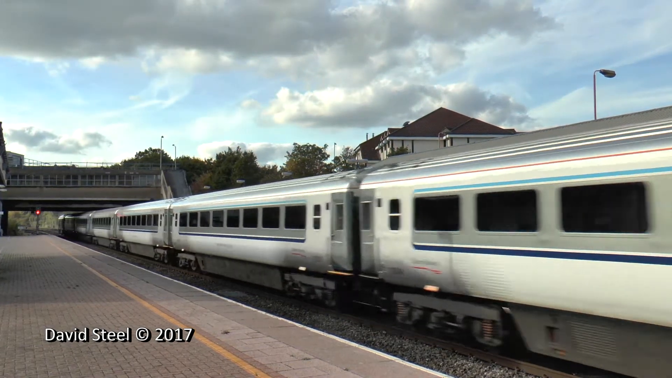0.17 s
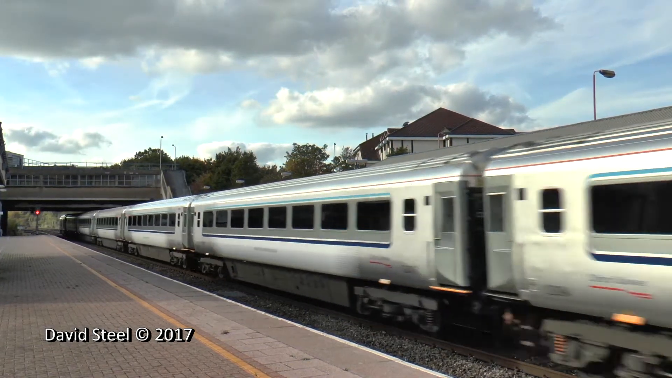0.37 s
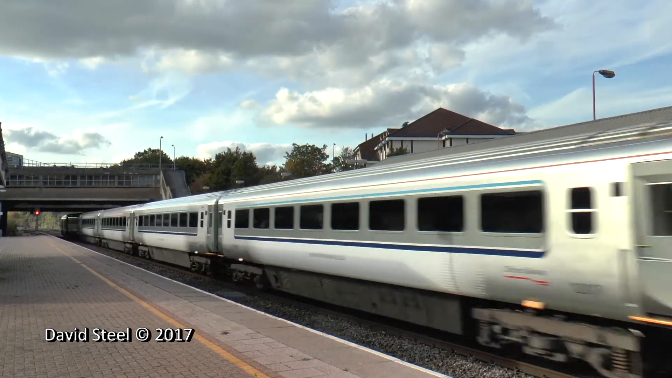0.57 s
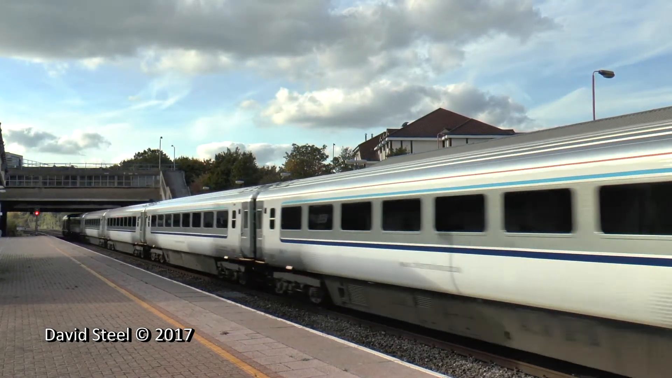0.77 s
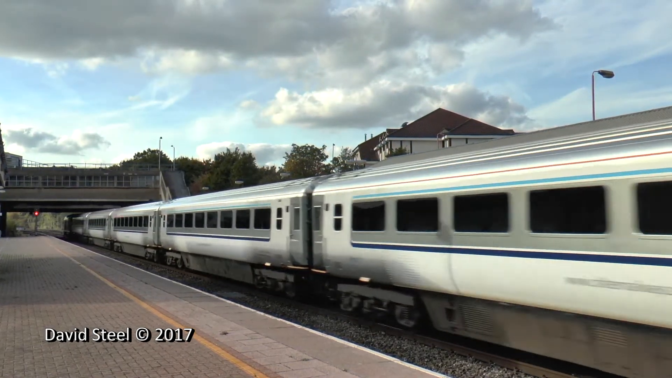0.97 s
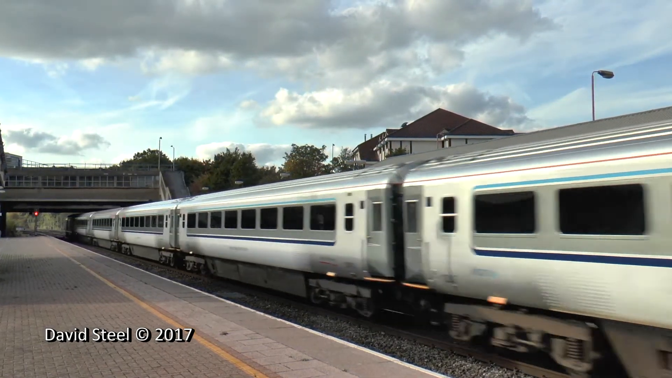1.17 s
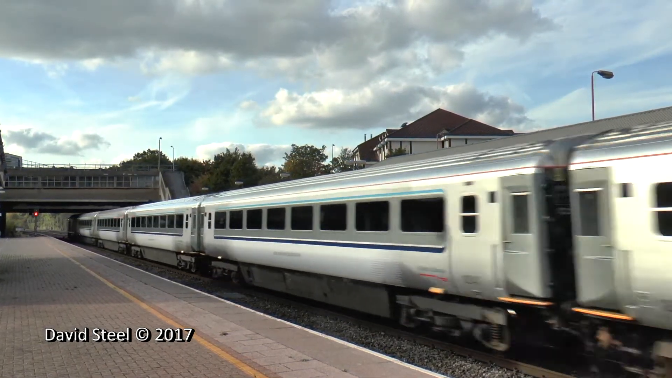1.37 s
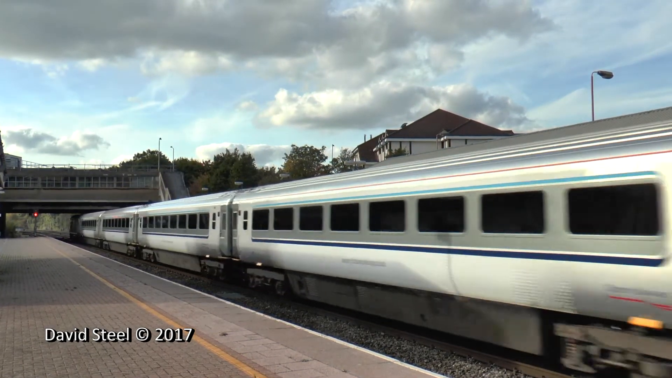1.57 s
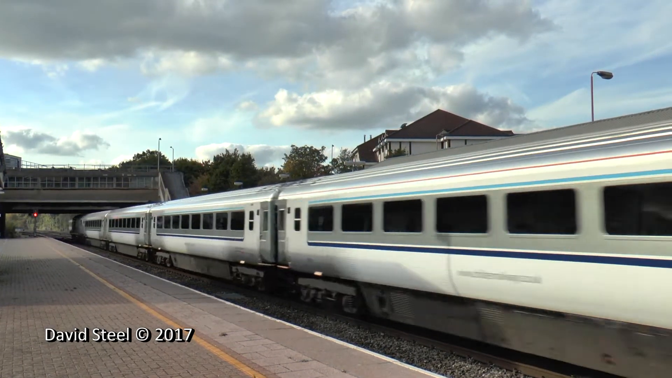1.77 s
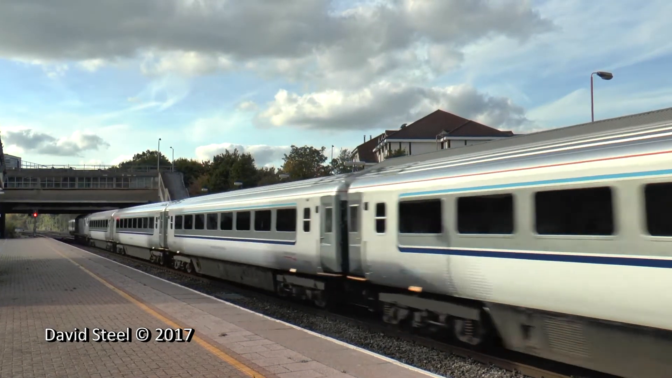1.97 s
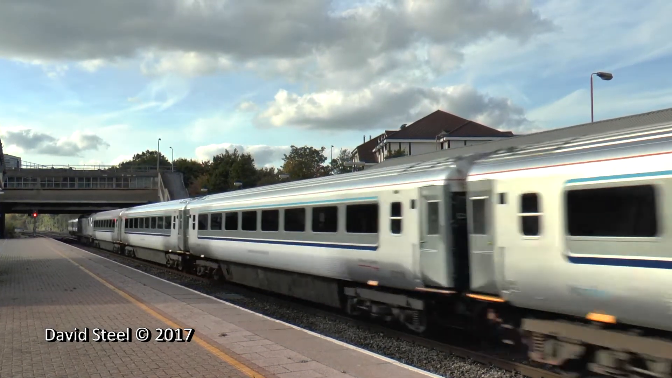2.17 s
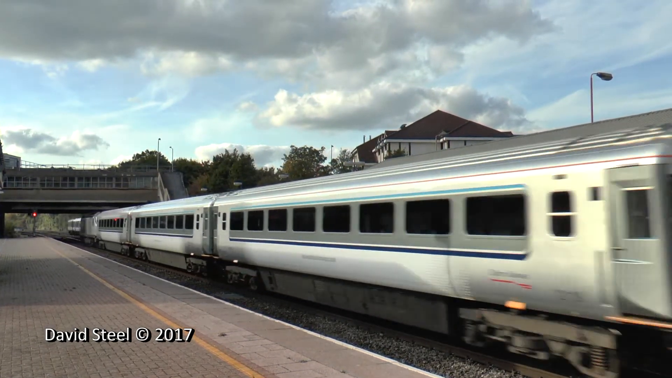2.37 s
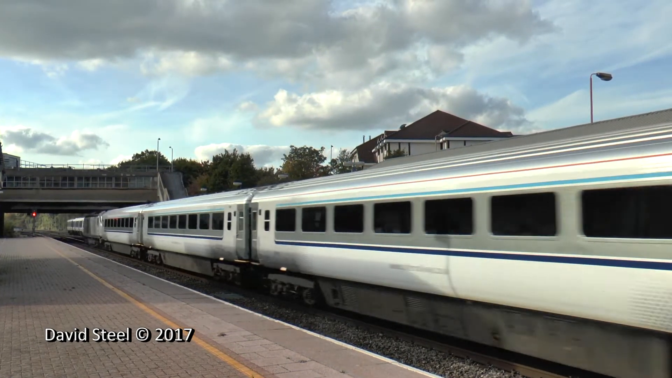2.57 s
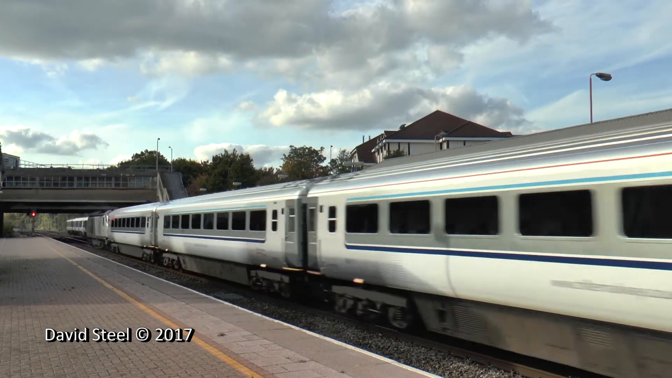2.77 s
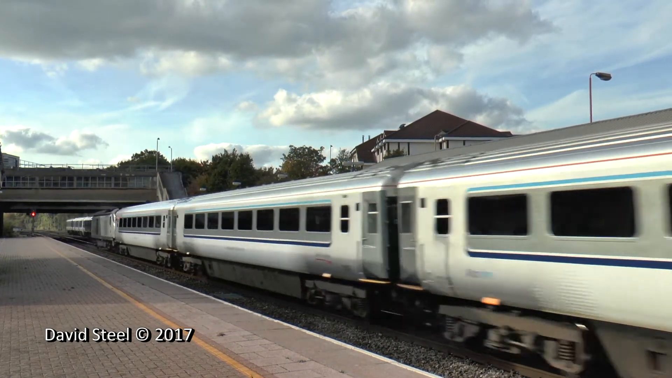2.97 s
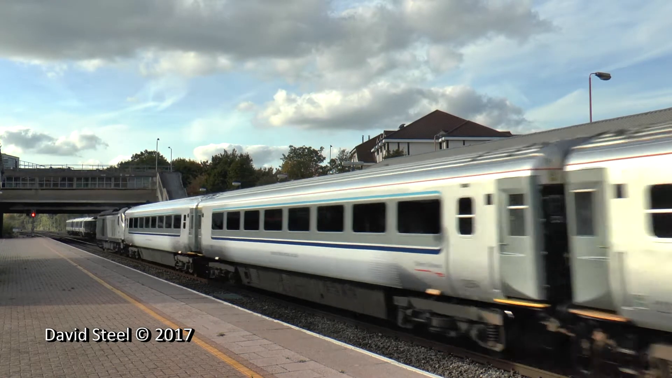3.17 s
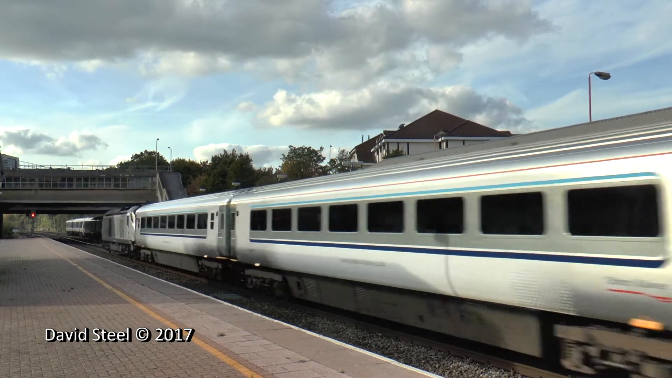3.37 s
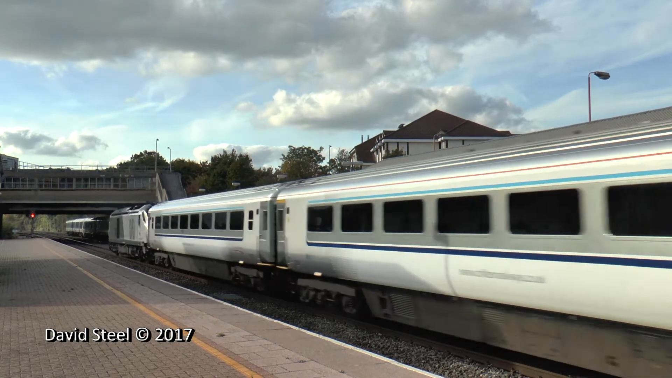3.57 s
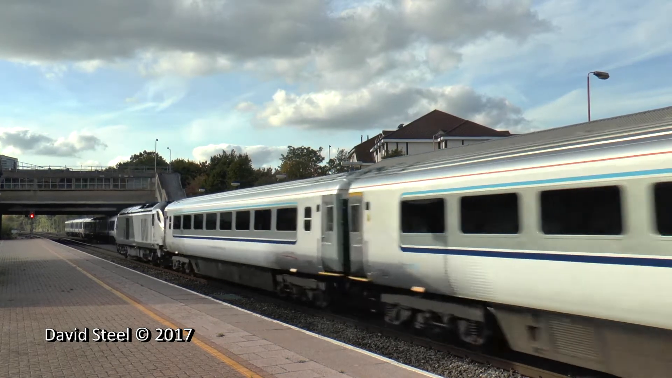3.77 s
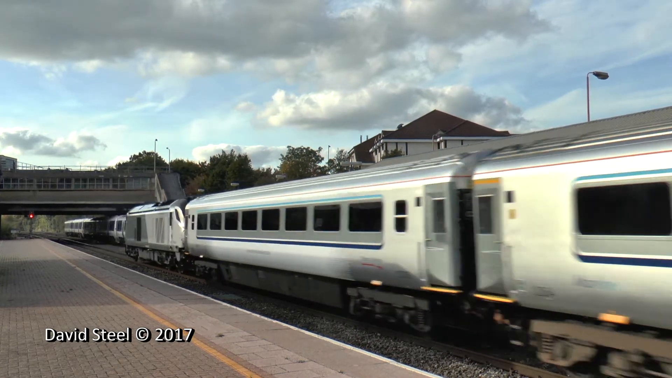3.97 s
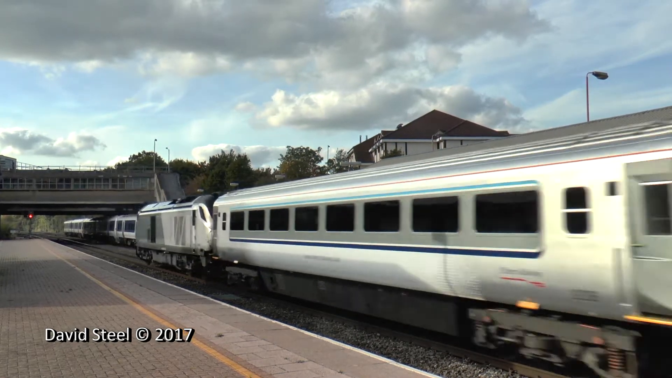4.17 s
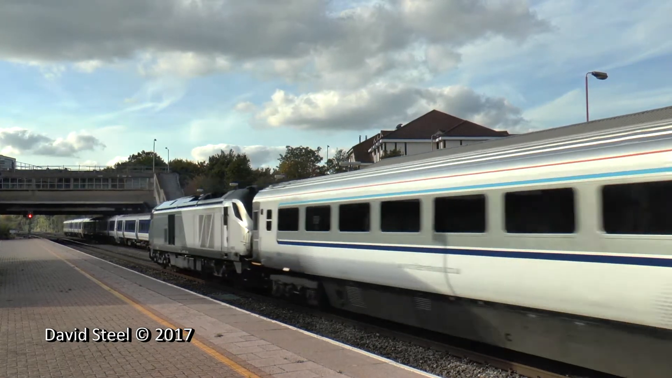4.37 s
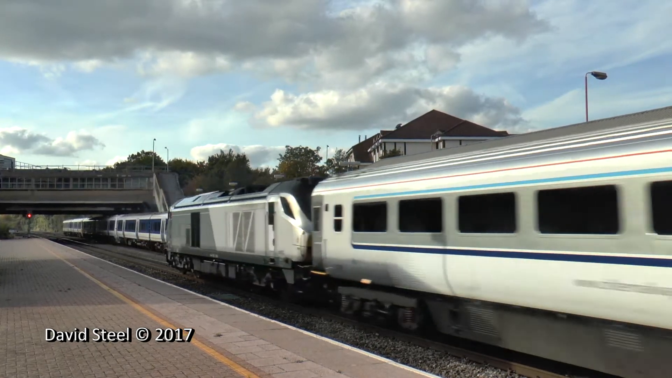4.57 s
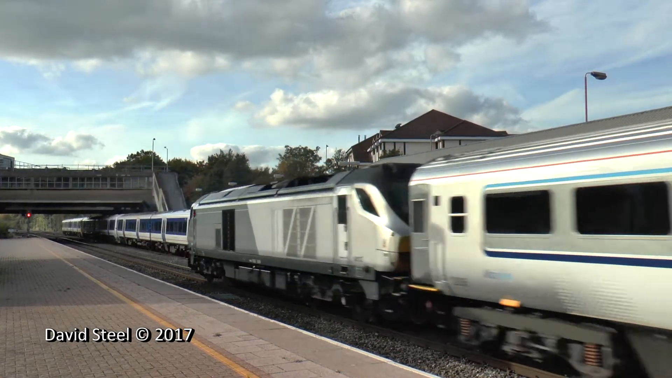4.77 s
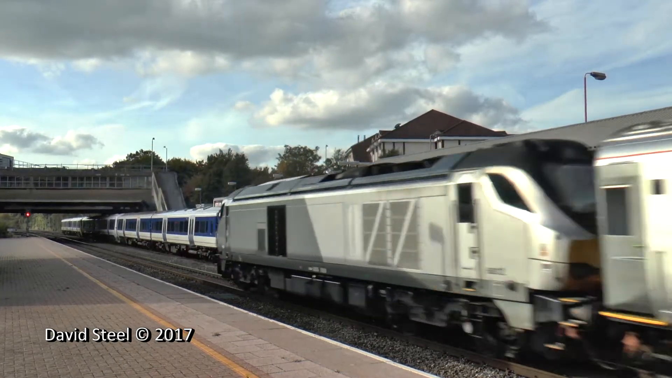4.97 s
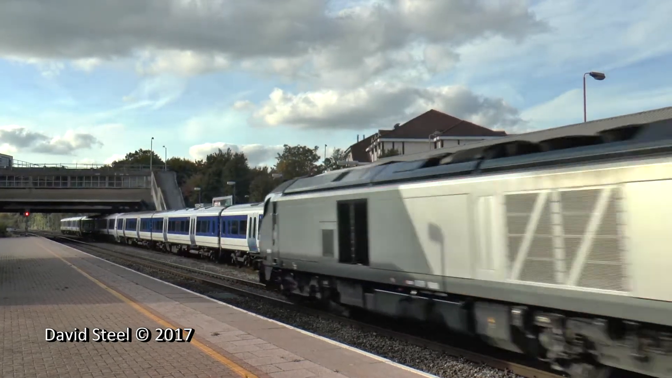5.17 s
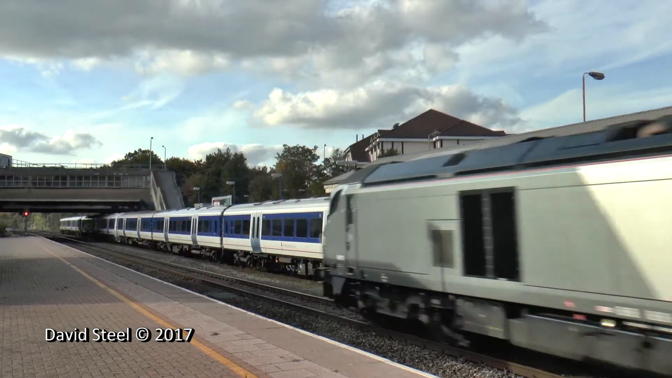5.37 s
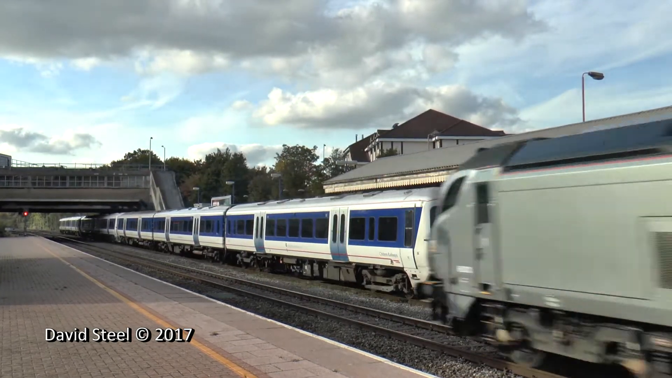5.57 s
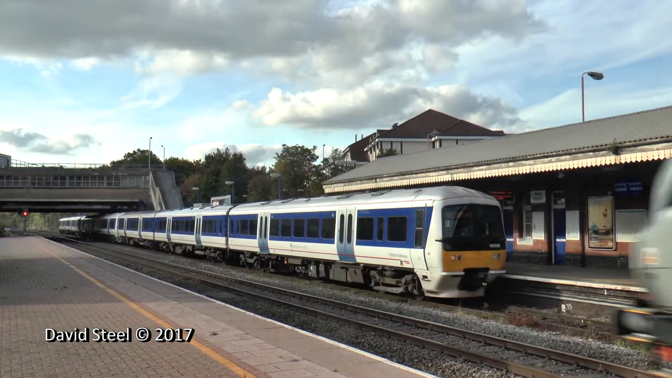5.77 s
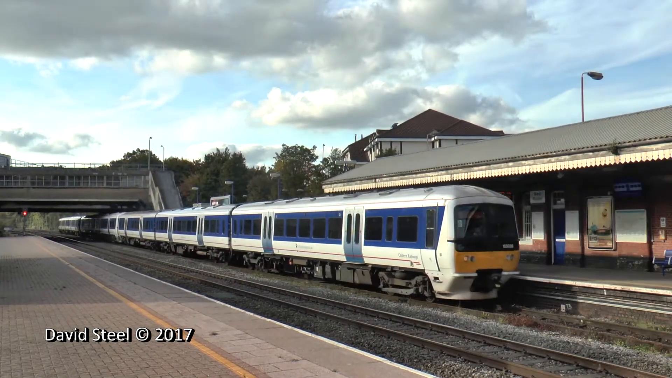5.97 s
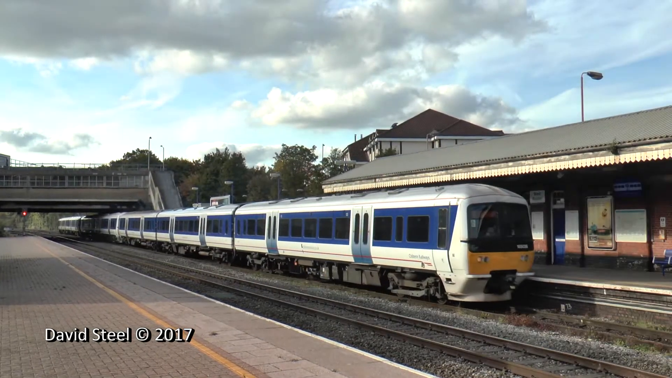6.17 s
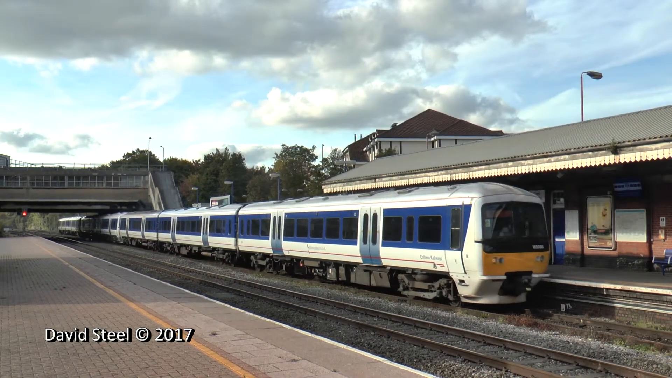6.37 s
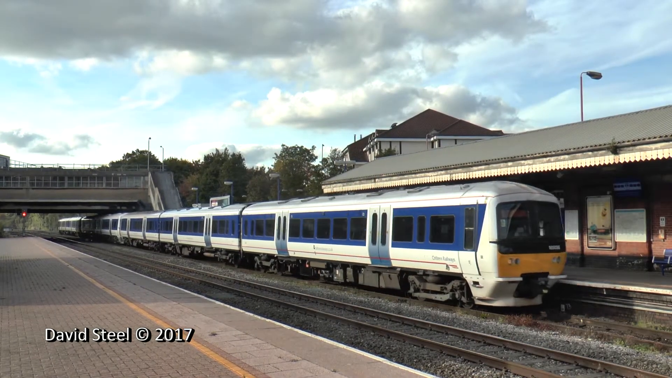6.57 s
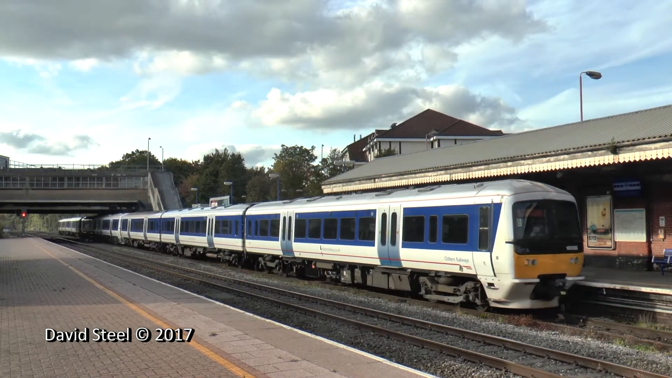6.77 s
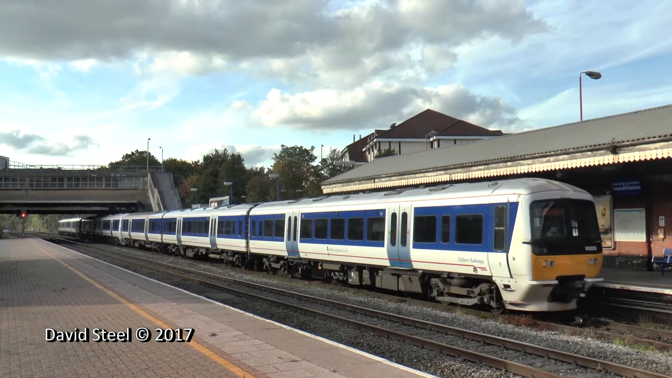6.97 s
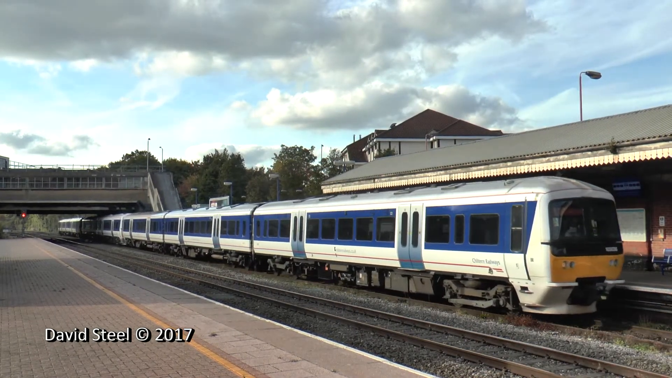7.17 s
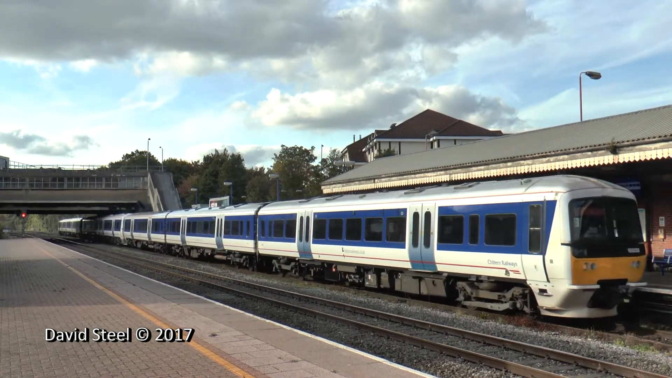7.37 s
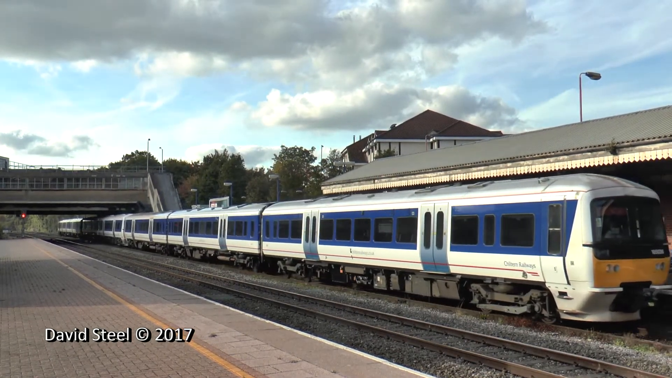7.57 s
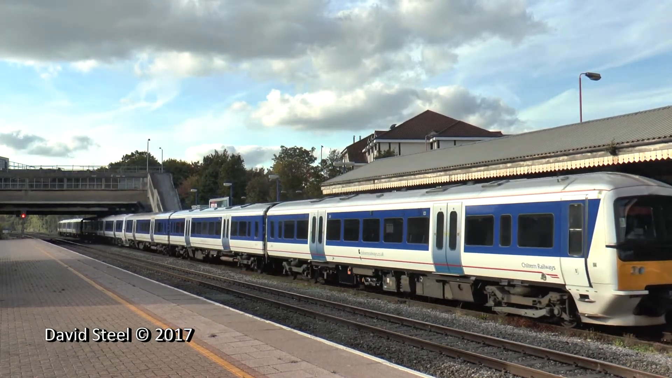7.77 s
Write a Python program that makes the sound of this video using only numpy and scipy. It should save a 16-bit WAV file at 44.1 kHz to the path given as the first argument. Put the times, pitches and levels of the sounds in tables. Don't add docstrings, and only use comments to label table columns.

```python
import sys
import numpy as np
from scipy import signal
from scipy.fft import rfft, irfft, next_fast_len
from scipy.io import wavfile
from scipy.ndimage import uniform_filter1d, map_coordinates

SR = 44100
rng = np.random.default_rng(int(sys.argv[2]) if len(sys.argv) > 2 else 0)


def magnitude_from_level(level_db):
    exponent = np.asarray(level_db, float) / 20
    return 10 ** exponent


def transcribe(u):
    v = np.clip(np.atleast_2d(u).T, -1, 1)
    q = np.round(v * 32767).astype(np.int16)
    wavfile.write(sys.argv[1], SR, q)


N = 345303

# time in seconds, rumble in dB, wind in dB.
GROUND = [(0, -40, -54), (.1, -37.5, -52), (.44, -39, -58), (1.5, -36, -52), (2.5, -35, -56),
          (3.4, -31, -50), (3.8, -30.5, -52), (4.1, -42.5, -47), (4.5, -38, -47), (4.9, -36, -54),
          (5.3, -37.5, -53), (5.45, -31, -50), (5.62, -33, -52), (5.9, -30, -52), (6.2, -37.5, -52),
          (6.8, -36, -49), (7.1, -42, -51), (7.83, -39, -47)]
# frequency in Hz, level in dB per Hz.
RUMBLE_COLOUR = [(35, -48), (55, -9), (80, -3.5), (125, 2), (273, 0), (320, -2.5), (405, -4.5), (460, -19),
                 (620, -22), (1060, -120)]
WIND_COLOUR = [(15, -40), (28, -30), (40, 0), (60, -10.5), (90, -19), (120, -120)]

# time in seconds, level in dB, rail roughness in dB.
ROLL = [(0, -37.5, 5.5), (.1, -38.5, -0.5), (.45, -41, 4.5), (1.37, -41.5, 4), (1.85, -40, 4),
        (2.3, -41.5, 6), (2.87, -39.5, 8), (3.25, -41.5, 10), (3.68, -40, 6.5), (4.26, -45.5, 8.5),
        (4.6, -45, 6), (5.2, -43, 9.5)]
# frequency in Hz, level in dB per Hz.
RAIL_COLOUR = [(250, -11.5), (420, -4.5), (501, -8.5), (628, -3), (821, 0.5), (1090, -6), (1320, -16.5),
               (1400, -13), (1820, -16.5), (3080, -120)]
WHEEL_COLOUR = [(760, -10.5), (1300, -8), (1460, -5.5), (1590, -12), (1730, -1.5), (2210, -2), (2650, -12),
                (3440, -25), (5830, -120)]
WEB_COLOUR = [(1530, -50), (2600, -7), (3410, -6.5), (3780, -5.5), (5300, -11), (6890, -40), (11700, -120)]
HISS_COLOUR = [(3060, -5), (5200, -26), (5470, -6), (5890, 2), (6510, 0), (7890, -10), (10300, -14),
               (11400, -17), (15600, -30)]
WHEEL_DB, WHEEL_FOLLOWS, HISS_DB, HISS_FOLLOWS = -38.5, 0.14, -44, 1.16
WHEEL_ROUGH = 0.55
WHEEL_SINGS = 0.067
# time in seconds, pitch in Hz, level in dB.
BOGIES = [(.12, 2090, -45), (.7, 2050, -45), (1.2, 2160, -49), (1.879, 2177, -42.5), (2.4, 2200, -43),
          (2.85, 2146, -41.5), (3.6, 2126, -41.5), (4.4, 1973, -43), (5.35, 2200, -45.5),
          (6.1, 2150, -43.5), (6.85, 2150, -42.5), (7.6, 2100, -48.5)]
SING_FALL_HZ_PER_S, SING_RISE_S, SING_FADE_S = 300, .2, .18
# time in seconds, change in dB.
LULLS = [(.3, -1), (.52, -1), (.68, 0.5), (1.05, 1), (1.37, -0.5), (1.62, -0.5), (1.74, 0.5), (2.05, 0),
         (2.24, -0.5), (2.56, 0.5), (2.92, -1), (3.08, 0.5), (3.8, -1), (4.76, 0.5), (5.24, 0), (5.88, 0),
         (6.33, -1), (6.84, 1), (4.06, -1), (4.88, -3), (5.56, -2), (5.705, 0), (6.7, -1.5), (7.1, -1.5)]
LULL_S = 0.055
# time in seconds, peak in dB,
# wheel ring in dB.
FLAT_BLOWS = [(0.005, -28, -2), (0.115, -22.5, -5), (0.222, -25.5, -8), (0.34, -30, -11), (0.396, -30, -7),
              (0.452, -24.5, -23), (0.553, -26.5, -3), (0.576, -26, -20), (.664, -26.5, -10),
              (.726, -32.5, -10), (.77, -27, -10), (.852, -29.5, -12), (.97, -32, -6), (1.045, -33, -10),
              (1.462, -26.5, -12), (1.72, -27.5, -14), (1.837, -27, -10), (1.995, -33, -10),
              (2.036, -27.5, -13), (2.12, -30.5, -7), (2.216, -27, -15), (2.6, -27.5, -12),
              (2.46, -23.5, -12), (2.494, -32.5, -13), (2.526, -24, -13), (2.567, -23, -17),
              (2.639, -20.5, -11), (2.676, -29, -15), (2.797, -26, -11), (2.919, -26, -8), (3.22, -29, -19),
              (3.295, -30, -19), (3.413, -24, -10), (3.665, -24, -10), (2.764, -20, -11),
              (2.871, -22.5, -13), (3.105, -32, -14), (3.129, -27, -30), (3.259, -24.5, -26),
              (3.348, -25.5, -4), (3.441, -21, -7), (3.542, -17.5, -10), (3.569, -21, -10),
              (3.642, -21.5, -5), (3.749, -17, -3.5), (3.862, -21, -7), (3.975, -22.5, -2),
              (4.191, -26, -18), (4.279, -36, 5), (4.41, -27.5, -7), (4.973, -32, -6), (5.133, -30.5, 1),
              (5.397, -28, 1), (5.47, -27.5, 3), (5.791, -31, 7.5), (6.016, -27, 2), (6.2, -33, 3),
              (6.255, -30.5, 5), (6.63, -32.5, 7)]
# pitch in Hz, level in dB, time to fall by 60 dB in seconds.
FLAT_MODES = [
    (768, -1, 0.097),
    (925.6, -1.5, 0.094),
    (2150, -1.5, 0.03),
    (4440, -10, .03),
]
# time in seconds, pitch in Hz, level in
# dB.
STREAKS = [(.06, 3251, -45), (.07, 3789, -51), (.13, 2174, -49), (.18, 2024, -51), (.19, 2950, -47),
           (.34, 2928, -51), (.52, 3165, -47), (.57, 2050, -50), (.68, 2070, -44), (.78, 2050, -45),
           (.89, 2325, -52), (.91, 4198, -54), (.95, 2030, -53), (1.22, 1873, -52), (1.54, 2200, -54),
           (1.58, 2433, -49), (1.63, 3740, -65), (1.81, 3768, -54), (1.86, 2196, -54), (2.01, 2196, -52),
           (2.12, 3079, -54), (2.12, 3811, -52), (2.33, 1790, -48), (2.47, 2240, -49), (2.54, 1840, -47),
           (2.75, 2220, -46), (2.82, 1850, -49), (2.94, 2153, -48), (3.05, 2095, -46), (3.54, 2140, -50),
           (3.63, 2088, -43.5), (3.72, 3746, -49), (3.83, 4306, -54), (3.99, 2900, -54), (4.37, 4263, -56),
           (4.38, 2045, -51), (4.95, 604, -45), (5.11, 775, -45), (5.17, 2304, -52), (5.41, 508, -39.5),
           (5.47, 722, -40), (5.54, 839, -43), (5.711, 3240, -45), (5.74, 2670, -47), (5.83, 772, -47),
           (5.95, 760, -40), (5.95, 695, -48), (4.99, 776, -46), (5.97, 1959, -48), (6.07, 3208, -54),
           (6.13, 2217, -45), (6.27, 2140, -47), (6.3, 2799, -50), (6.47, 2153, -45), (6.48, 3574, -56),
           (6.64, 3200, -56), (6.73, 1981, -45), (6.9, 2239, -53)]
STREAK_S, STREAK_FALL_PER_S, STREAK_ROUGH = 0.049, .06, 0.63

# time in seconds, engine cycle in Hz, level in dB.
WALL = [(.9, 17, -70), (1.3, 15.9, -46), (2.1, 17.6, -38.5), (2.5, 16.8, -32.5), (2.9, 16.3, -33),
        (3.2, 17, -58), (3.5, 16, -72), (5.9, 17.4, -68), (6.35, 15.3, -37), (6.75, 15.3, -27.5),
        (7, 15.5, -27), (7.12, 14.3, -30), (7.25, 16.6, -30), (7.45, 14, -50), (7.6, 13.2, -70)]
# multiple of the cycle as a plain number, level in dB.
RETURNED = [(8, -2.5), (9, 1.5), (10, -5.5), (11, -2), (12, -10)]

SPEED, SOUND, CYCLE_HZ, ABREAST_S, ENGINE_M = 25.5, 343, 14.36, 5.726, 8
# time in seconds, bearing as a plain number, negative left, 0 ahead, positive
BEARING = [
    (0, -0.19, 0.29),
    (2.5, -0.17, .3),
    (3.8, -0.34, .25),
    (4.5, 0.14, 0.81),
    (5.3, 0.32, 0.11),
    (5.75, 1.13, 0.13),
    (6.3, 1.41, 0.64),
    (7, 0.71, 0.73),
    (7.83, 0.66, 0.72),
]
# time in seconds, level in dB, brightness in dB per octave.
DRONE = [(0.6, -40.5, 12), (1.4, -34, 1.5), (2.0, -23, 2), (2.5, -23, -6), (2.9, -21, -11),
         (3.2, -22.5, -5.5), (3.5, -22, -2.5), (4.1, -19.5, -2.5), (4.9, -18.5, -1.5), (5.5, -19.5, 0),
         (6.1, -22, -5.5), (6.7, -22, 0), (7.1, -24, 0), (7.36, -23, -2.5), (7.5, -30.5, 12),
         (7.8, -26.5, -2)]
# multiple of the cycle as a plain number, level in dB.
STRONG = [(7, -11.9), (8, -4.7), (9, -0.0), (10, -12.3), (11, -3.7), (12, -9.7), (13, -11.6), (15, -11.9)]
# multiple of the cycle as a plain number, level against it in dB.
WEAK = [(5, -18), (6, -25), (14, -10), (16, -12), (17, -6), (18, -20), (19, -25.5), (20, -17), (21, -19)]
# time in seconds, multiple as a plain number, change in dB.
FADES = [(.95, 11, 6), (.97, 9, -12), (1.34, 15, -13.5), (1.69, 10, -10), (1.93, 9, -8.5),
         (1.96, 15, -11.5), (2.09, 8, -9), (2.55, 10, 4), (2.72, 8, -5.5), (3.2, 12, -3), (3.34, 10, -10.5),
         (3.49, 11, -5.5), (3.62, 9, -7.5), (3.75, 7, -8), (4.05, 12, 4), (4.1, 13, 6), (4.2, 8, -4),
         (4.3, 9, 1.5), (5.01, 10, -8), (5.8, 10, -12), (5.8, 12, -4), (5.8, 13, -5), (6.55, 15, 3),
         (6.6, 8, -7.5), (6.98, 15, -10.5), (7.05, 9, 5), (1.6, 10, -7), (1.6, 12, -6), (1.6, 13, -7),
         (.58, 11, -11), (.6, 13, -13), (6.4, 7, -4), (7.65, 7, 6), (7.65, 8, -4), (6.1, 13, 4),
         (7.2, 13, 5), (6.5, 12, -4), (7.65, 11, -4), (4.8, 14, -6), (7.13, 11, -6.5), (7.16, 7, -7.5),
         (7.35, 12, -10), (6.85, 17, 9), (5.1, 17, 5), (3.35, 17, 4), (5.85, 17, 6), (2.1, 17, -8),
         (3.45, 15, 4), (5.5, 15, -3), (7.1, 15, 4), (5.55, 5, 11), (4.35, 5, 5), (6.3, 5, 6),
         (5.75, 21, 9), (5.5, 19, 8), (5.7, 18, 6), (5.4, 20, 8), (5.9, 8, 3), (7.3, 9, 4), (3.85, 13, 4)]
FADE_S = .25
# frequency in Hz, level in dB per Hz.
PUFF_COLOUR = [(60, -120), (88, -37), (115, 0.5), (150, -10), (200, -4), (280, -13.5), (400, -37),
               (500, -120)]
# time in seconds, swell in dB.
CHUFFS = [(5.229, -0.5), (5.315, 1.5), (5.362, 2.5), (5.415, 4), (5.478, 4), (5.54, 2), (5.62, 2.5),
          (5.661, 4), (5.75, 4.5), (5.813, 5.5), (5.895, 4), (5.96, 2.5), (6.045, 3.5), (6.104, 2),
          (6.189, 3), (6.257, 1.5), (6.338, 2.5), (6.41, 1), (6.47, 1), (6.558, 2.5), (6.639, 3.5),
          (6.702, 4), (6.78, 2), (6.839, 2), (6.942, 3), (6.99, 2), (7.087, 0.5), (7.215, 3.5)]
CHUFF_S = .021
# frequency in Hz, level in dB per Hz.
BODY_COLOUR = [(180, -14), (300, -4.5), (486, -7), (646, -5), (749, -4), (892, -12.5), (1040, -10),
               (1250, -15), (1400, -13), (1820, -46), (3080, -120)]
CLATTER_COLOUR = [(760, -39), (1300, -20), (1470, -2), (1620, -4), (2190, -0.5), (2550, -5.5), (3320, -18),
                  (5610, -120)]
RASP_COLOUR = [(1500, -39), (2550, -1), (3210, 0), (3910, -5), (5200, -8), (6760, -26), (11400, -120)]
TOP_COLOUR = [(4300, -120), (4900, -7.5), (6500, -3), (7300, -9), (8000, -14), (11000, -20.5), (13000, -42),
              (15700, -40)]
# time abreast in seconds, level in dB, approach in seconds,
# retreat in seconds, level of the slower train's like part in dB.
BODY_PASS = (6, -34, 1, 0.46, -38.5)
CLATTER_PASS = (5.5, -37, .5, 0.93, -43)
RASP_PASS = (6, -35.5, 0.65, 0.5, -44.5)
TOP_PASS = (5.5, -43.5, 0.3, 0.54, -56)
DRAWS_IN_S, DRAWING_S = 7.6, 0.42
# time in seconds, change in dB.
BETWEEN = [
    (6.85, 1.36),
    (7.15, -0.048),
]
BETWEEN_S = 0.11
# time in seconds, level in dB.
TURBO = [(3.8, -63), (4.78, -56), (4.95, -58), (5.45, -44), (5.72, -43), (5.97, -49.5), (6.16, -58.5),
         (6.6, -56.5), (6.95, -61), (7.3, -61), (7.83, -68)]
# time abreast in seconds, pitch at rest in Hz, loudest time in seconds, level in dB.
GEARS = [
    (5.53, 726, 5.47, -37.5),
    (6.098, 720, 5.9, -37.5),
]
# leading bogie in seconds, trailing bogie in seconds.
GEAR_RISE_S = (0.47, 0.092)
GEAR_FADE_S = (0.1, 0.17)
BOGIE_M = 6
GEAR_PURE = .55

# frequency in Hz, level in dB,
# phase in radians.
PORTS = [(80, -14, -1.9), (300, -11, -2.15), (550, -8, -2.5), (1200, -7, -2.75), (1900, -6, -3.3),
         (3500, -6.5, -3.8), (4500, -9, -4.1), (5400, -13, -4.6), (5900, -32, -5), (6800, -32, -7),
         (7300, -20, -8), (7900, -5, -9), (9000, -1, -9.6), (10300, -2, -10.2), (12000, -6, -10.2),
         (14000, -4, -9.5)]
# frequency in Hz, level in dB per Hz.
AIR_COLOUR = [(6000, -120), (8000, -3), (12000, -10), (15700, -18)]


def unit(x):
    return x / np.sqrt(np.mean(np.abs(x) ** 2) + 1e-20)


def along(points, hz):
    f, *cols = np.transpose(points)
    return [np.interp(np.log(hz + 1), np.log(f + 1), c) for c in cols]


def curves(rows):
    s, *cols = np.transpose(rows)
    return [np.interp(np.arange(N) / SR, s, c) for c in cols]


def ramp(t0, t1):
    return np.sin(np.pi / 2 * np.clip((np.arange(N) / SR - t0) / (t1 - t0), 0, 1))


def wobble(rate):
    knots = rng.standard_normal(int(N * rate / SR) + 4)
    return map_coordinates(knots, [np.arange(N) * rate / SR])


def bumps(rows, width_s):
    t = np.arange(N) / SR
    return sum((db * np.exp(-((t - s) / width_s) ** 2) for s, db in rows), 0)


def filtered(x, response):
    m = next_fast_len(N + 8192)
    return irfft(rfft(x, m) * response(np.fft.rfftfreq(m, 1 / SR)), m)[..., :N]


def rush(spectrum, patchy_db):
    z = signal.stft(rng.standard_normal((2, N)), nperseg=512)[2]
    field = uniform_filter1d(rng.standard_normal(z.shape[1:]), size=5, axis=0)
    field = uniform_filter1d(field, size=12, axis=1)
    pair = signal.istft(z * magnitude_from_level(patchy_db * unit(field)), nperseg=512)[1][:, :N]
    return unit(filtered(pair, lambda hz: magnitude_from_level(along(spectrum, hz)[0])))


def band(turns, width_hz):
    z = filtered(rng.standard_normal((4, N)), lambda hz: np.exp(-(hz / width_hz) ** 2))
    return unit(z[:2] * np.cos(2 * np.pi * turns) + z[2:] * np.sin(2 * np.pi * turns))


def place(pair, bearing, scattered):
    return np.array([pair[0], bearing * pair[0] + scattered * pair[1]])


def doppler(hz, abreast_s, metres):
    x = SPEED * (np.arange(N) / SR - abreast_s)
    return hz / (1 + SPEED / SOUND * x / np.hypot(x, metres))


def passing(since_s, before_s, after_s):
    return -10 * np.log10(1 + (since_s / np.where(since_s < 0, before_s, after_s)) ** 2)


def ground():
    rumble_db, wind_db = curves(GROUND)
    rumble = magnitude_from_level(rumble_db + 3.5 + 0.5 * wobble(4.6)) * rush(RUMBLE_COLOUR, patchy_db=1.0)
    wind = magnitude_from_level(wind_db + 1.3 * wobble(5.2)) * rush(WIND_COLOUR, patchy_db=2.0)
    rumble_bearing = np.interp(np.arange(N) / SR, [0, 1.5, 4.5, 5.8], [0.44, 0.25, 0.36, 1.0])
    return place(rumble, rumble_bearing, 0.61) + place(wind, .6, 1.4)


def streaks():
    half = SR // 5
    out, t = np.zeros((2, N + SR)), np.arange(-half, half) / SR
    knots = rng.standard_normal((len(STREAKS), 4, 24))
    for (s, hz, db), k in zip(STREAKS, knots):
        a, b, c, d = [np.interp(t, np.linspace(t[0], t[-1], len(row)), row) for row in k]
        u = 2 * np.pi * hz * (t - STREAK_FALL_PER_S * t * t / 2)
        direct = (1 + STREAK_ROUGH * a) * np.sin(u) + STREAK_ROUGH * b * np.cos(u)
        scattered = c * np.sin(u) + d * np.cos(u)
        swell = np.sqrt(2) * magnitude_from_level(db) * np.exp(-(t / STREAK_S) ** 2)
        out[:, round(s * SR):][:, :len(t)] += swell * [direct, scattered]
    return place(out[:, half:][:, :N], 0.61, 0.44)


def wheel_flat():
    out, t = np.zeros((2, N)), np.arange(SR // 10) / SR
    rise = 1 - np.exp(-t / 0.00068)
    blow = rise * magnitude_from_level(-60 * t / 0.14)
    rail = rush(RAIL_COLOUR, patchy_db=2.5)
    wheel = band(2130 * np.arange(N) / SR, width_hz=370) + 0.48 * rush(WEB_COLOUR, patchy_db=-4.0)
    chance = rng.standard_normal((len(FLAT_BLOWS), len(FLAT_MODES), 2))
    for (s, db, ring_db), row in zip(FLAT_BLOWS, chance):
        here = slice(round(s * SR), round(s * SR) + len(t))
        out[:, here] += magnitude_from_level(db - 18.5) * unit(blow * rail[:, here])
        out[:, here] += magnitude_from_level(db + ring_db - 17.5) * unit(blow * wheel[:, here])
        for (hz, level_db, t60), (size, tune) in zip(FLAT_MODES, row):
            mode_db = level_db + 2 * size + ring_db * (hz > 1500) - 60 * t / t60
            ring = magnitude_from_level(mode_db) * np.sin(2 * np.pi * hz * (1 + .02 * tune) * t)
            out[0, here] += magnitude_from_level(db - 5.5) * rise * ring
    return out


def coaches():
    t = np.arange(N) / SR
    level_db, rough_db = curves(ROLL)
    s, hz, db = np.transpose(BOGIES)[..., None]
    levels = db + 2 * passing(t - s, SING_RISE_S, SING_FADE_S)
    nearest, sing_db = levels.argmax(axis=0), levels.max(axis=0)
    shake = 0.29 * wobble(12) + 0.32 * wobble(40)
    swell_db = level_db + 41
    wheel_db = WHEEL_DB + WHEEL_FOLLOWS * swell_db
    wheel_db = wheel_db + WHEEL_ROUGH * (rough_db - rough_db.mean())
    wheel_db = wheel_db + WHEEL_SINGS * (sing_db - sing_db.mean())
    hiss_db = HISS_DB + HISS_FOLLOWS * swell_db
    roll = magnitude_from_level(level_db + rough_db + 1.3 * shake) * rush(RAIL_COLOUR, patchy_db=1.0)
    roll += magnitude_from_level(wheel_db + shake) * rush(WHEEL_COLOUR, patchy_db=0.66)
    roll += magnitude_from_level(level_db + 0.74 * shake) * rush(WEB_COLOUR, patchy_db=0.5)
    roll += magnitude_from_level(hiss_db + 0.87 * shake) * rush(HISS_COLOUR, patchy_db=1.0)
    sing_hz = hz[nearest, 0] - SING_FALL_HZ_PER_S * np.clip(t - s[nearest, 0], -1, 1)
    sing = magnitude_from_level(sing_db) * band(np.cumsum(sing_hz) / SR, width_hz=190)
    last_coach_gone = 1 - ramp(4.41, 5.66) ** 2
    rolling = magnitude_from_level(bumps(LULLS, LULL_S)) * (last_coach_gone * roll + sing)
    bearing = np.interp(t, [0, 3.8, 4.6], [1.15, 1.05, .6])
    return place(rolling + wheel_flat(), bearing, 0.74)


def drone(turns, orders, levels_db, unsteady_db, fuzz_db):
    out = np.zeros((2, N))
    for k, db in zip(orders, levels_db):
        firing = np.pi if k < 8 else 0 if k % 2 else (8 - k) * np.pi / 3
        slip = .15 * wobble(7) + .4 * wobble(2)
        loudness = np.sqrt(2) * magnitude_from_level(db + unsteady_db * wobble(6.8))
        out[0] += loudness * np.sin(2 * np.pi * k * turns + firing + slip)
        out += magnitude_from_level(db + fuzz_db) * band(k * turns, width_hz=6)
    return out


def wall_echo():
    hz, db = curves(WALL)
    orders, under = np.transpose(RETURNED)
    levels = [db + u for u in under]
    echo = drone(np.cumsum(hz) / SR, orders, levels, unsteady_db=1.5, fuzz_db=-8)
    return place(echo, .4, 1)


def exhaust(turns):
    def fades(k):
        return bumps([(s, change) for s, m, change in FADES if m == k], FADE_S)

    level_db, bright = curves(DRONE)
    levels = [level_db + db + bright * np.log2(k / 9) + fades(k) for k, db in STRONG]
    for k, db in WEAK:
        levels_db = levels[len(STRONG) - 1] + db + fades(k)
        levels.append(levels_db)
    orders = [k for k, _ in STRONG + WEAK]
    out = ramp(.3, .9) * drone(turns, orders, levels, unsteady_db=1.1, fuzz_db=-18)
    loudness = np.sqrt(sum(magnitude_from_level(db) ** 2 for db in levels))
    puff_db = -15.5 - 4 * ramp(2.9, 3.3) + 2.5 * wobble(2.5)
    return out + magnitude_from_level(puff_db) * loudness * rush(PUFF_COLOUR, patchy_db=2.5)


def roar(abreast_s, db, before_s, after_s, slower_db):
    t = np.arange(N) / SR
    engine = magnitude_from_level(db + 1.26 * passing(t - abreast_s, before_s, after_s))
    slower = magnitude_from_level(slower_db + passing(t - DRAWS_IN_S, DRAWING_S, DRAWING_S))
    return np.hypot(engine, slower)


def engine_clatter(chuff):
    noise = magnitude_from_level(0.5 * chuff + 0.36 * wobble(11.0)) * roar(*BODY_PASS) * rush(BODY_COLOUR, patchy_db=-1.0)
    noise += magnitude_from_level(chuff + 0.8 * wobble(70)) * roar(*CLATTER_PASS) * rush(CLATTER_COLOUR, patchy_db=0.8)
    noise += magnitude_from_level(1.15 * chuff + 0.33 * wobble(45)) * roar(*RASP_PASS) * rush(RASP_COLOUR, patchy_db=1.5)
    noise += magnitude_from_level(1.0 * chuff) * roar(*TOP_PASS) * rush(TOP_COLOUR, patchy_db=1.5)
    return noise


def turbo_hiss(turns, chuff):
    whoosh = magnitude_from_level(1.2 * wobble(14)) * band(703 * turns, width_hz=800)
    whoosh += magnitude_from_level(-22 + 1.3 * chuff) * band(850 * turns, width_hz=2400)
    return magnitude_from_level(curves(TURBO)[0] - 1.5 + 0.19 * chuff) * ramp(3.6, 5.3) * whoosh


def gear_whine():
    t, out = np.arange(N) / SR, np.zeros((2, N))
    for (s, hz, loudest_s, db), rise_s, fade_s in zip(GEARS, GEAR_RISE_S, GEAR_FADE_S):
        turns = np.cumsum(doppler(hz, s, BOGIE_M)) / SR
        whine = np.sqrt(1 - GEAR_PURE ** 2) * band(turns, width_hz=35)
        whine[0] += GEAR_PURE * np.sqrt(2) * np.sin(2 * np.pi * turns)
        out += magnitude_from_level(db + 1.1 * wobble(11) + 1.4 * passing(t - loudest_s, rise_s, fade_s)) * whine
    return out


def locomotive():
    turns = np.cumsum(doppler(CYCLE_HZ, ABREAST_S, ENGINE_M)) / SR
    chuff = bumps(CHUFFS, CHUFF_S)
    bearing, scattered = curves(BEARING)
    lull = magnitude_from_level(bumps(LULLS, LULL_S) + bumps(BETWEEN, BETWEEN_S))
    high = lull * (ramp(3.4, 4.5) * engine_clatter(chuff) + gear_whine())
    out = place(exhaust(turns), 0.99 * bearing, 0.6)
    out += place(high, 0.06 + 1.0 * bearing, scattered + 0.36)
    out += place(lull * turbo_hiss(turns, chuff), 0.96 * bearing, 3.8 * scattered * bearing)
    return out


def scene():
    return ground() + streaks() + coaches() + wall_echo() + locomotive()


def band_limit(x):
    return signal.sosfilt(signal.butter(12, 15725, fs=SR, output="sos"), x)


def record(dry):
    def ports(hz):
        level_db, phase = along(PORTS, hz)
        return magnitude_from_level(level_db) * np.exp(1j * phase)

    side = filtered(dry[1], ports)
    hiss = magnitude_from_level(-64.0) * rush(AIR_COLOUR, patchy_db=-1.0)
    mix = np.array([dry[0] + side, dry[0] - side]) + hiss
    return band_limit(mix)


dry = scene()
out = record(dry)
transcribe(out)
```